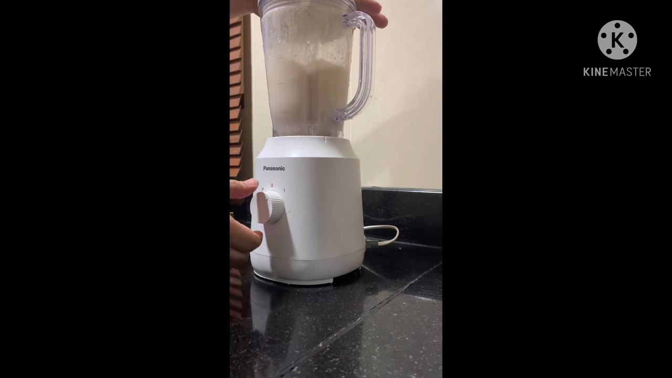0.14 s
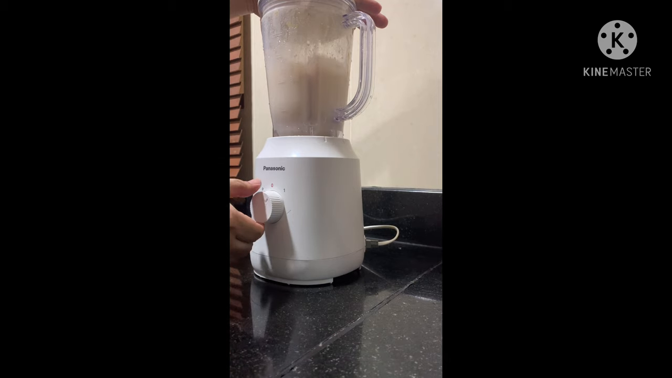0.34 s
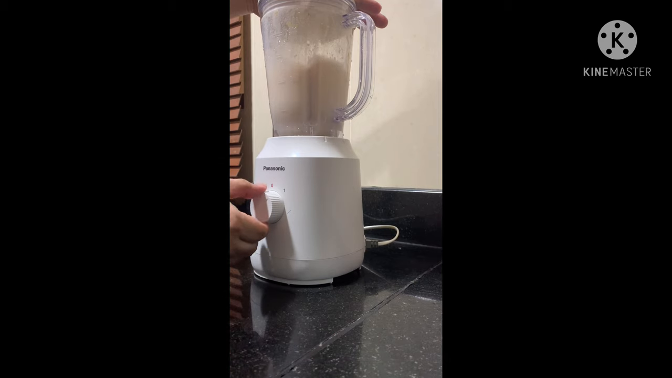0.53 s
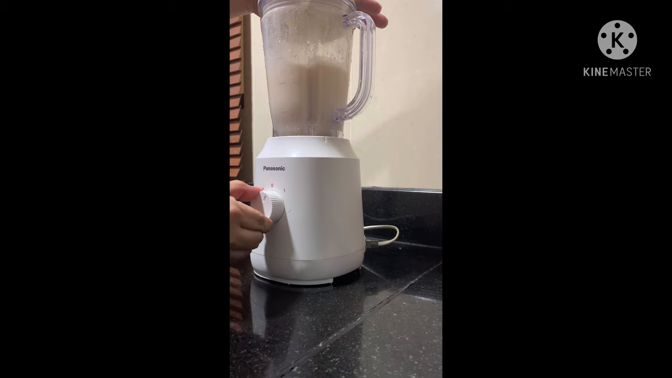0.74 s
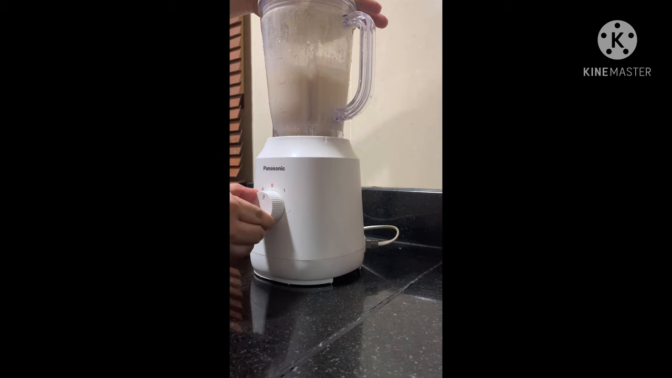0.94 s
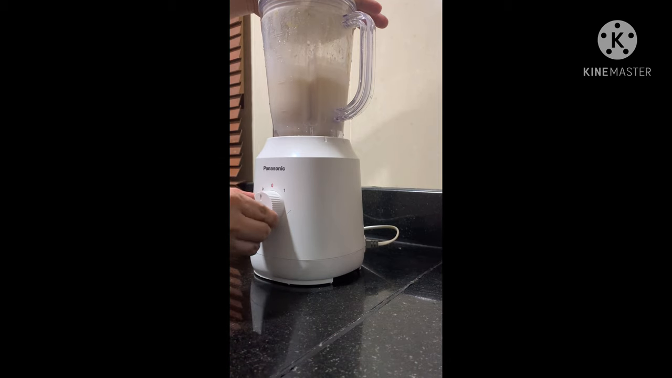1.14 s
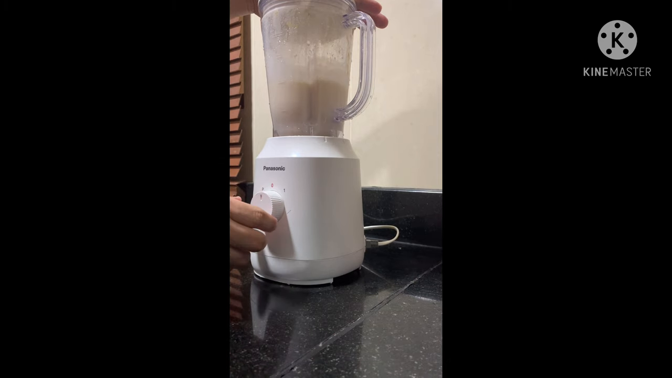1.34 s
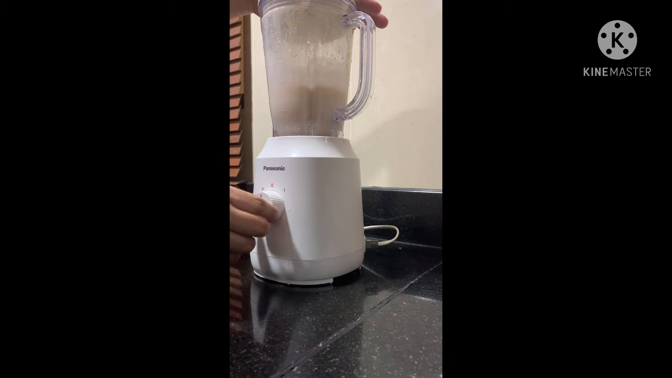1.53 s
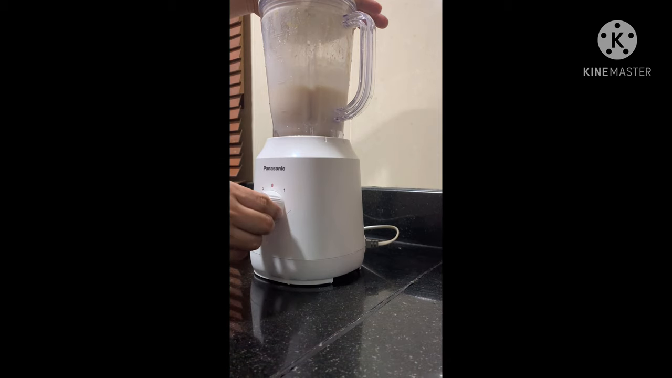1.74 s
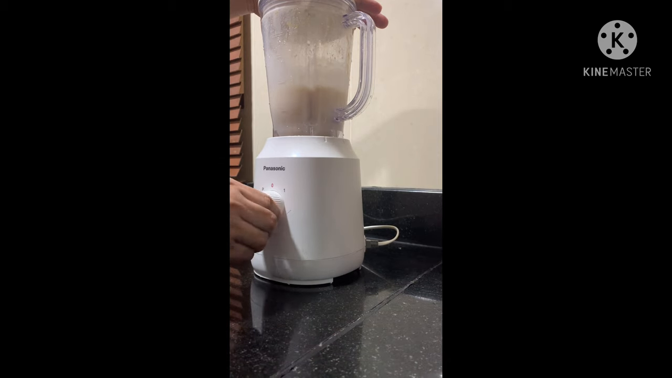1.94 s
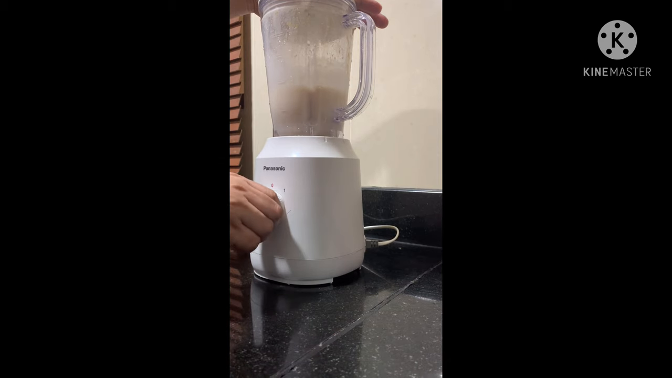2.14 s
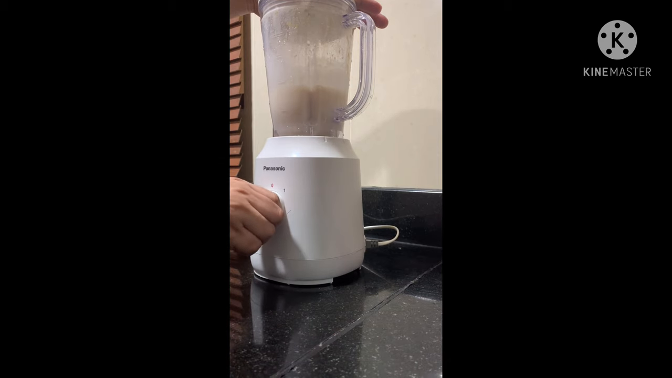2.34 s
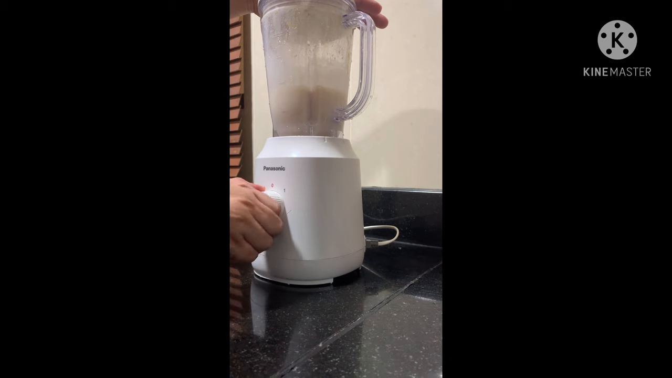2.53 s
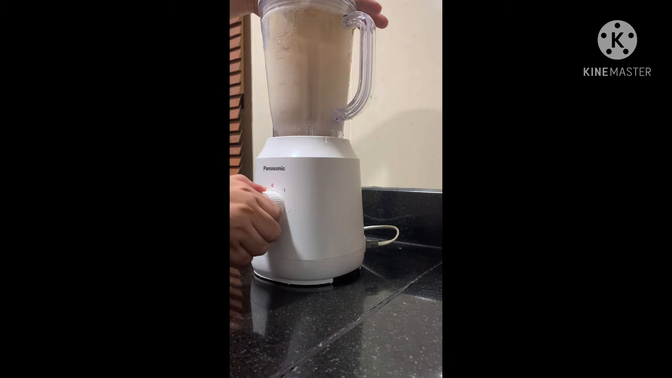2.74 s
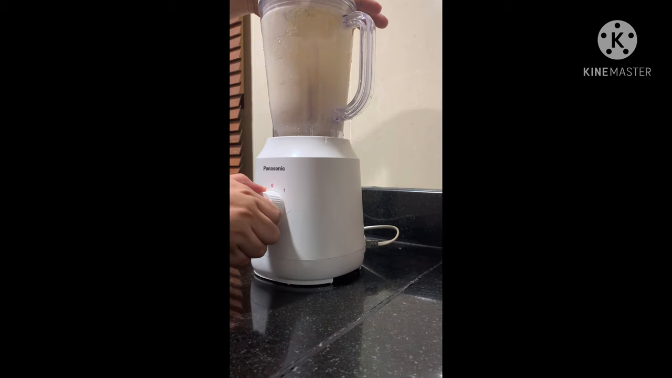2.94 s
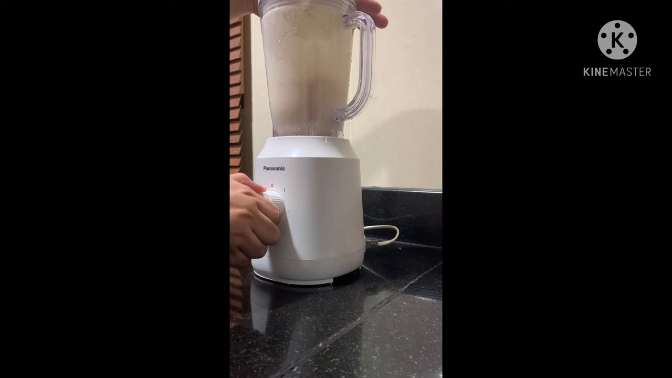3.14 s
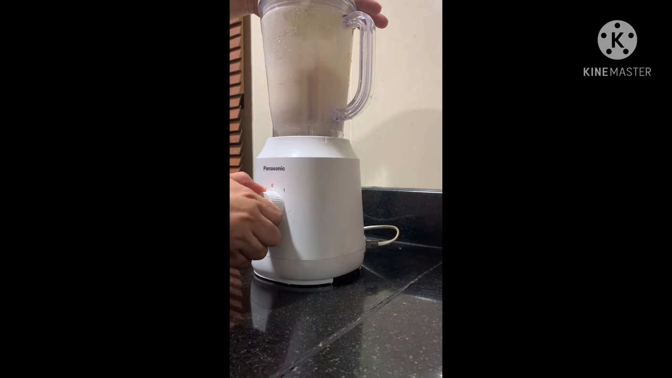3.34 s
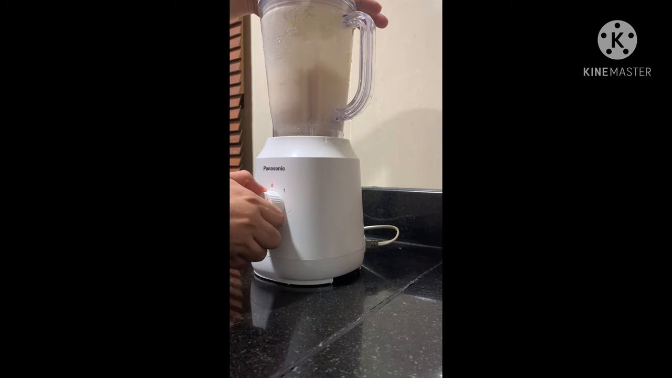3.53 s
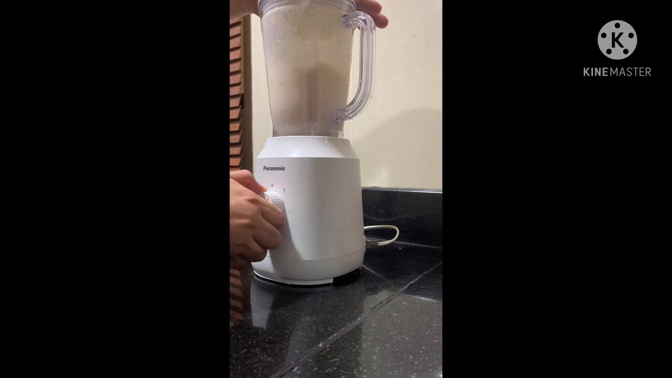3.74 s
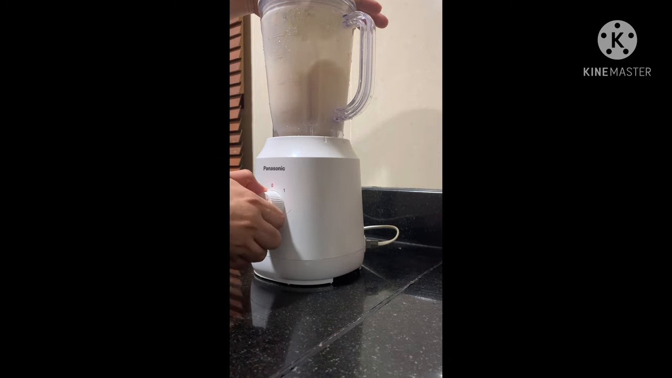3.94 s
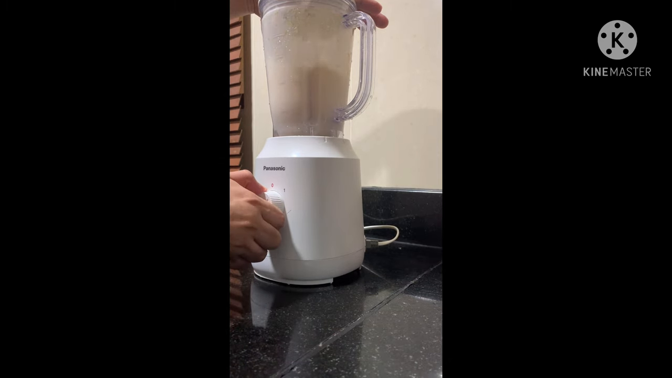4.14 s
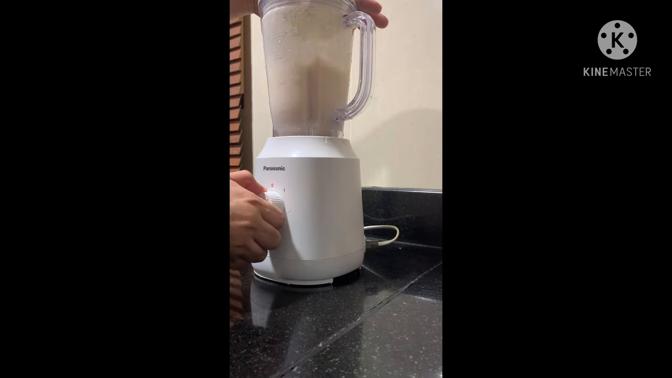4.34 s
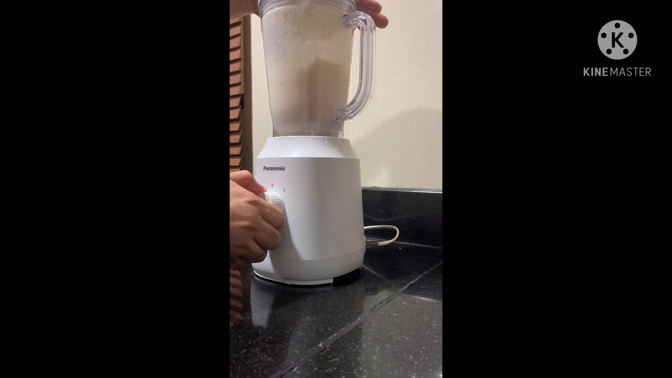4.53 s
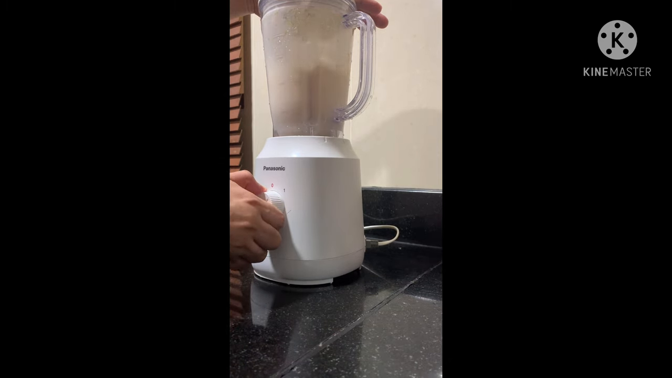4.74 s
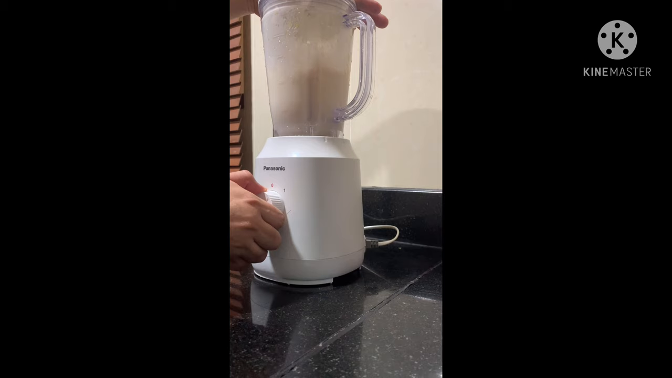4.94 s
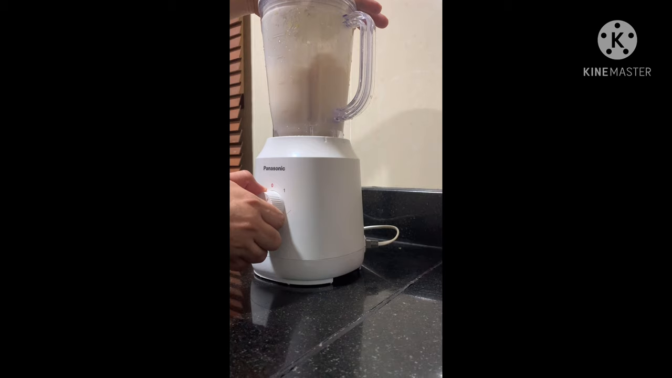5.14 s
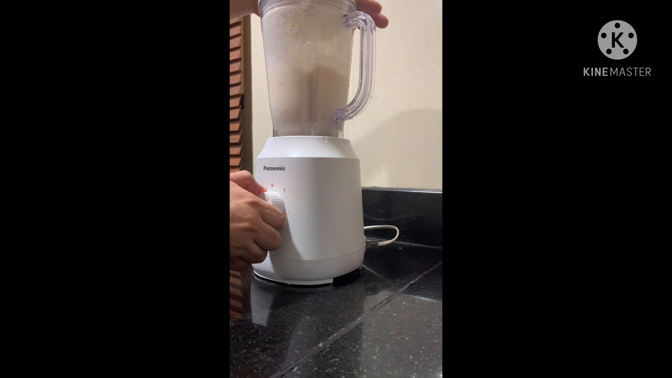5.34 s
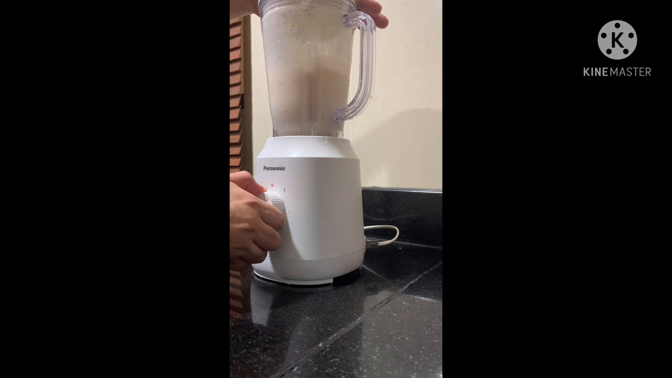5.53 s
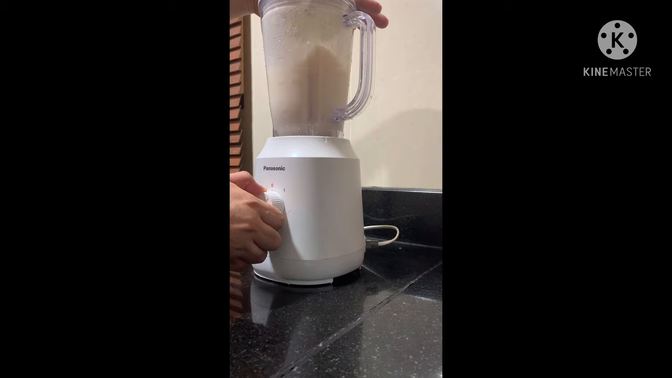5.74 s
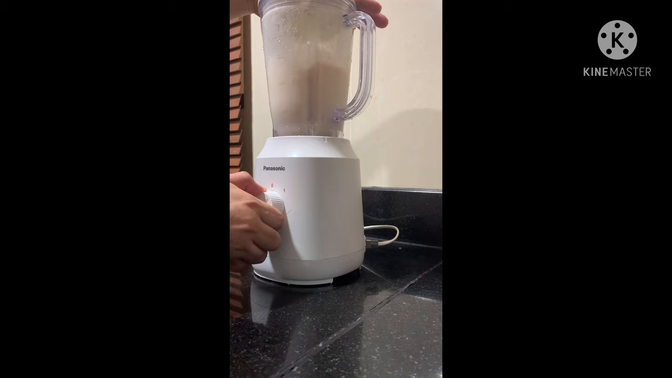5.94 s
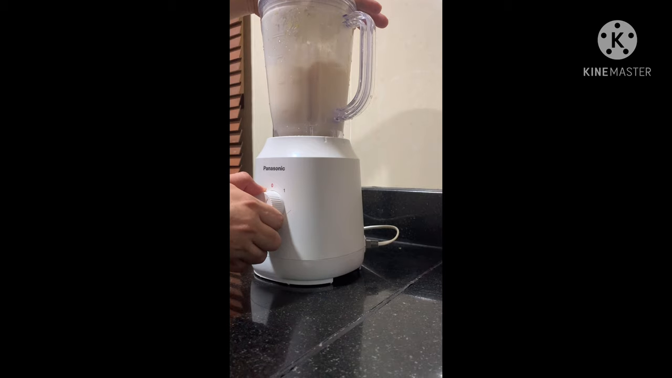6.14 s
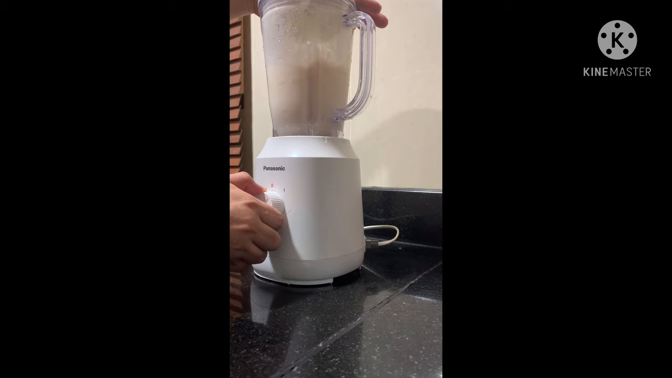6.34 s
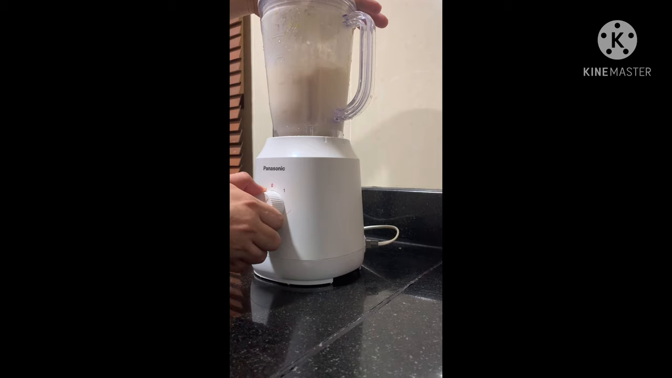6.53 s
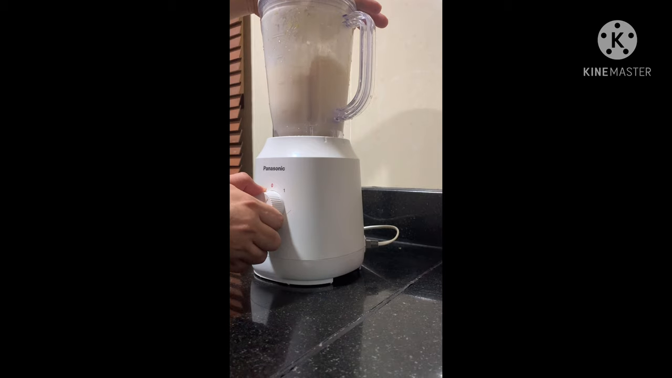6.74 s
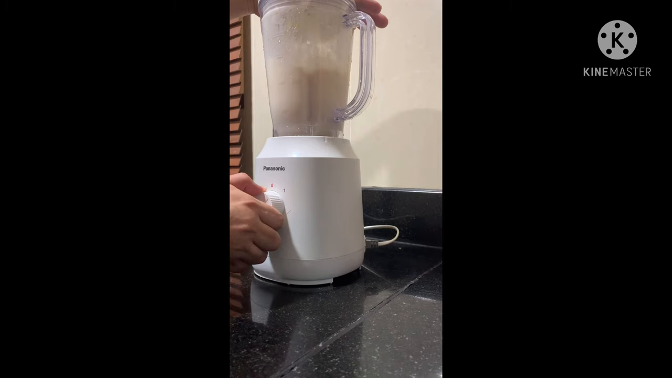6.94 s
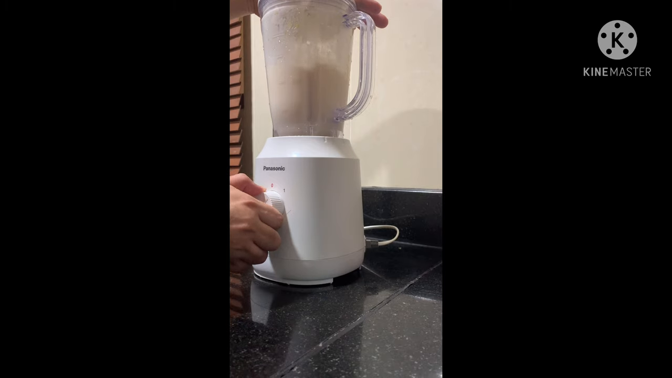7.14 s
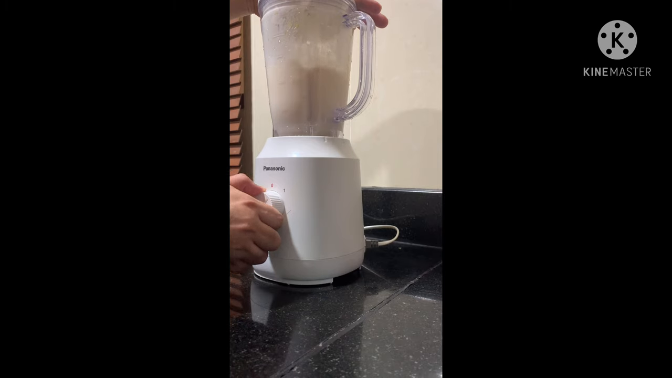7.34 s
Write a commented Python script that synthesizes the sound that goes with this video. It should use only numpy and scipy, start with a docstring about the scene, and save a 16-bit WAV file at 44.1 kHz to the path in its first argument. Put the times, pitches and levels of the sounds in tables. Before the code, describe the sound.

A countertop blender is churning slush when its knob clicks twice and the motor winds down with a falling whirr. After a short pause with faint rustling, a sharp click starts it again. It jolts, its feet chatter briefly on the stone counter, and it rises to a louder, steady roar with a low hum and bright hiss. It is heard nearby in stereo, with a short kitchen echo.

```python
"""In a kitchen, a blender on a stone counter coasts to a stop after two clicks of its knob,
rests with faint rustles, and is switched on again with a jolt and a short chatter of its feet.
The unbalanced shaft hums, the mains current throbs in the motor, and fan air and churned slush
roar through the housing and jar. Two microphone ports (left and right) hear it all directly,
the left a little late, and by way of the kitchen walls."""
import sys
import numpy as np
from scipy import signal
from scipy.fft import rfft, irfft, next_fast_len
from scipy.io import wavfile
from scipy.ndimage import uniform_filter1d

SR = 44100
rng = np.random.default_rng(int(sys.argv[2]) if len(sys.argv) > 2 else 0)


def generate_wav(signal):
    """Clip the signal to [-1, 1] and save it as 16-bit WAV at the path in sys.argv[1]."""
    frames = np.transpose(np.atleast_2d(signal))
    scaled = np.clip(frames, -1, 1) * 32767
    pcm = np.round(scaled).astype(np.int16)
    wavfile.write(sys.argv[1], SR, pcm)


N = 325017
T = np.arange(N) / SR
SIZE = next_fast_len(N + SR)
HZ = np.arange(SIZE // 2 + 1) * SR / SIZE
PATHS = 3  # rows of a sound: direct, scattered to the left, scattered to the right
FULL_HZ, MAINS_HZ = 212, 100  # shaft at full speed; magnetic pull, twice per mains cycle

# The two spells with the current on: on/s, off/s, mains hum/dB, roar/dB, shaft hum/dB,
# twice-a-turn hum/dB (base levels)
POWER = [(-.1, .745, -56, -30.5, -45, -49.5), (2.56, 8, -50, -26.5, -39.5, -44)]
CUT_S, RESTART_S = POWER[0][1], POWER[1][0]
# Pitches at which the housing rings: f/Hz, width/Hz, boost/dB
HOUSING = [(309, 50, 4), (600, 36, 2.5), (951, 30, 8.5), (1254, 35, 5.5), (1747, 48, 4), (1845, 36, 4.5),
           (2002, 150, 5), (2152, 120, 4.5), (2365, 82, 9), (2678, 173, 9), (2932, 51, 6), (4900, 200, 3.5),
           (10100, 70, 4.5)]
RESTARTED = T >= RESTART_S
SINCE_RESTART = np.clip(T - RESTART_S, 0, None)


def undb(db):
    """Turn decibels into a gain."""
    return 10 ** (np.asarray(db) / 20)


def over_hz(table):
    """Read a table of (f/Hz, value) at every frequency."""
    hz, value = np.transpose(table)
    return np.interp(np.log(HZ + 1), np.log(hz), value)


def colour(x, spectrum, rings=()):
    """Shape a sound by a spectrum and any ringing pitches, then set its rms level to 1."""
    boost = undb(sum(db / (1 + (2 * (HZ - f) / width) ** 2) for f, width, db in rings))
    y = irfft(rfft(x, SIZE) * boost * undb(over_hz(spectrum)), SIZE)[..., :N]
    return y / np.sqrt(np.mean(y ** 2))


def walk(rate):
    """A smooth random wander that picks a new value `rate` times a second."""
    hold = int(SR / rate)
    steps = np.repeat(rng.standard_normal(N // hold + 1), hold)
    return uniform_filter1d(uniform_filter1d(steps, hold), hold)[:N]


def fade(t, t60):
    """A fade that drops 60 dB in t60 seconds."""
    return np.exp(-np.log(1000) * t / t60)


def swell(peak_s, db, rise_s, fall_s):
    """A level that rises to a peak and falls away."""
    return undb(db) * np.exp(np.minimum((T - peak_s) / rise_s, (peak_s - T) / fall_s))


def kitchen():
    """The room's low hush, with a faint hum from elsewhere."""
    # Spectrum of the hush: f/Hz, level/dB
    spectrum = [(30, -8), (60, -7.5), (110, -6.5), (173, -23), (260, -17), (450, -23), (600, -28.5),
                (800, -33), (1800, -42), (3000, -49.5), (4500, -53), (12000, -58), (16000, -85)]
    # Tones of the far hum: f/Hz, level/dB
    far_hum = [(247.6, -77), (489.9, -81)]
    hush = undb(-59 + 1.8 * walk(5.2)) * colour(rng.standard_normal((PATHS, N)), spectrum)
    return hush + sum(undb(db + 3 * walk(8.9)) * np.sin(2 * np.pi * f * T) for f, db in far_hum)


def shaft():
    """Drag slows the shaft, current spins it up: its speed, halvings below full speed, and angle."""
    # Speeding up after the restart: t/s, speed/Hz
    spin_up = [(2.575, 73.5), (2.651, 111.8), (2.711, 141.5), (2.805, 179.1), (2.893, 204.6), (3.1, 207),
               (3.4, 212.2), (7.4, 212.5)]
    first_hz, friction_hz, coast_s = 209.2, 30.13, .5
    coasted = np.clip(T - CUT_S, 0, None)
    coast = (first_hz + friction_hz) * np.exp(-coasted / coast_s) - friction_hz
    hz = np.where(RESTARTED, np.interp(T, *np.transpose(spin_up)), np.clip(coast, 1, None))
    halvings = np.log2(FULL_HZ / hz)
    wobble = 1 + 0.01174 * walk(18) + .015 * snag(halvings) * walk(41.8)
    return hz, halvings, 2 * np.pi * np.cumsum(hz * wobble) / SR


def snag(halvings):
    """A coasting shaft catches on the slush more as it slows."""
    return ~RESTARTED * np.clip(halvings, 0, 2)


def levels(halvings):
    """Levels in dB of the roar, shaft hum and twice-a-turn hum as the motor coasts and restarts."""
    roar_db, hum_db, twice_db = np.array(POWER)[RESTARTED.astype(int), 3:].T
    lumpy = np.exp(-SINCE_RESTART) * RESTARTED  # a lumpy load is louder until it settles
    roar_dip = 14 * np.exp(-SINCE_RESTART / 0.24)  # the slush takes a moment to get moving
    twice_dip = 7 * np.exp(-(SINCE_RESTART / 0.29) ** 2)
    roar_db = roar_db + 3 * lumpy - np.where(RESTARTED, roar_dip, 11 * halvings)
    twice_db = twice_db - np.where(RESTARTED, twice_dip, 2 * halvings)
    return roar_db, hum_db + 5 * lumpy, twice_db


def shaft_hum(hz, halvings, angle, bouts):
    """The unbalanced shaft hums at 1, 2 and 5 times its speed; chatter adds to the lower two."""
    # The base bouncing on its feet: shaft speed/Hz, hum boost/dB
    bounce = [(40, -21), (65, -19), (80, -12), (100, 2.5), (130, 11.5), (170, 1.5), (195, 0), (212, -1)]
    roar_db, hum_db, twice_db = levels(halvings)
    hum_db = hum_db + np.interp(hz, *np.transpose(bounce))
    once = undb(hum_db + 2.1 * walk(12) + 1.5 * snag(halvings) * walk(35)) + undb(-14) * bouts
    twice = undb(twice_db + 1.1 * walk(7.7)) * (0.96 + 0.7 * walk(45))
    twice = twice * np.clip(hz / 73.8, 0, 1) ** 3 + undb(-6.5) * bouts  # dies away at low speed
    whine = undb(roar_db - 22 + 3.5 * walk(12))
    return once * np.sin(angle) + twice * np.sin(2 * angle) + whine * np.sin(5 * angle)


def mains_hum(angle):
    """The magnetic pull beats against the turning shaft: a hum, and a throb for the noisy layers."""
    pull = 2 * np.pi * MAINS_HZ * T
    live = sum(undb(db) * np.clip((T - on) / 0.017, 0, 1) * np.clip((off - T) / .03, 0, 1)
               for on, off, db, *_ in POWER)
    lower = undb(2.1 * walk(25)) * np.sin(angle - pull)
    upper = undb(5) * (0.4 + 1.2 * walk(50)) * np.sin(angle + pull)
    throb = 1 + .03 * (live > 0) * np.cos(pull) + .03 * np.cos(angle)
    return live * (np.sin(pull) + lower + upper), throb


def jar_thrum(lumps, halvings):
    """Lumps of slush make the jar thrum low, which stands out more as the blades slow."""
    # Spectrum of the thrum: f/Hz, level/dB
    spectrum = [(30, -36), (60, -18.5), (105, -10), (160, -15.5), (200, -13), (260, -4), (330, 1),
                (380, -10), (500, -5), (560, -12), (670, -2.5), (850, -17), (1100, -40)]
    return undb(-7 + 4 * halvings + 1.16 * walk(40)) * colour(lumps, spectrum, HOUSING)


def fast_roar(lumps):
    """Fast blades churn the slush into a roar; each band of it flutters on its own."""
    # Spectrum of the roar: f/Hz, level/dB
    spectrum = [(600, -37), (850, -19), (950, -12), (1200, -5.5), (1500, -11.5), (1790, -4.5), (2050, -2),
                (2400, -8.5), (2900, -6), (3200, -10.5), (4000, -7), (4700, -7), (5600, -13.5),
                (7000, -37.5)]
    # Centres of the fluttering bands: f/Hz
    bands = [600, 900, 1300, 1700, 1850, 2020, 2200, 2370, 2650, 2950, 3800, 4750, 7500]
    level = undb(2.5 + .5 * walk(9) + 0.87 * walk(60))
    whole, roar = rfft(colour(lumps, spectrum, HOUSING), SIZE), 0
    for share in np.eye(len(bands)):
        band = irfft(whole * np.interp(HZ, bands, share), SIZE)[:, :N]
        roar = roar + undb(1.6 * walk(45)) * band
    return level * roar


def fan_air(lumps, hz, halvings):
    """The fan blows hissing air through the housing and falls silent as it stalls."""
    # Fan air, a bright hiss from about 6 to 15 kHz: f/Hz, level/dB
    # The table also cuts a narrow gap at 11.6 kHz, which is not part of the fan's own sound.
    hiss_with_gap = [(4800, -17.5), (5600, -2.5), (6500, 2.5), (7000, 5), (7500, 0.5), (8200, 6), (9000, 1),
                     (10200, 1), (10900, 3), (11600, -34.5), (12400, 3), (13500, -7.5), (15000, -2.5),
                     (15600, -11.5)]
    stall_hz = 40
    level = np.clip(hz / stall_hz, 0, 1) ** 2 * undb(0.5 - halvings + 0.81 * walk(12))
    return level * colour(lumps, hiss_with_gap, HOUSING)


def knob():
    """The catch rubs up a slope and drops into a notch: a tick, and a scrape that rings the shell."""
    # Clicks: t/s, level/dB, extra for the tick/dB, extra for the low thud/dB, scrape fade/s,
    # extra for the rub/dB, dulling/dB per octave
    clicks = [(0.7248, -26.5, 15, 9, 0.0018, -40, 0), (0.7286, -19.5, -4, 6.5, 0.0046, -40, -1),
              (1.0149, -13.5, -5, -2, 0.0039, -35, 4), (1.0245, -19.5, -5, -1, 0.0047, -35, -2),
              (1.969, -63, -40, -6, .014, -10, 30), (2.5578, -11, -9, -3, 0.0048, -10.5, 2)]
    # Ringing of the plastic shell: f/Hz, level/dB, time to fade 60 dB/s
    rings = [(700, -11, 0.023), (1040, -8, 0.014), (1230, -9, 0.014), (1770, -6.5, 0.014),
             (2020, -1.5, 0.01), (2540, -1, 0.012), (3180, -2, 0.012), (3520, -6, .008),
             (4470, -11, 0.0071)]
    dull_above_hz, strike = 2300, 4.3
    out, t = np.zeros(N + SR), T[:SR // 10]
    tick_band = signal.butter(2, [4300, 13500], "band", fs=SR, output="sos")
    rub_band = signal.butter(1, [1200, 4500], "band", fs=SR, output="sos")
    tick_fade = np.exp(-t / 0.0041) + 0.2 * np.exp(-t / 0.018)
    for s, db, tick_db, thud_db, scrape_s, rub_db, dull_db in clicks:
        scrape = rng.standard_normal(len(t)) * np.exp(-t / scrape_s) + strike * (t == 0)
        shell = 0
        for k, (f, ring_db, t60) in enumerate(rings):
            gain = undb(ring_db + thud_db * (f < 900) - dull_db * max(np.log2(f / dull_above_hz), 0))
            shell = shell + (-1) ** k * gain * np.sin(2 * np.pi * f * t) * fade(t, t60)
        shell = signal.fftconvolve(shell, scrape)[:len(t)]
        tick = signal.sosfilt(tick_band, rng.standard_normal(len(t)) * tick_fade)
        rub = signal.sosfilt(rub_band, rng.standard_normal(len(t))) * np.exp(-t[::-1] / 0.0038)
        shell, tick, rub = (x / np.abs(x).max() for x in (shell, tick, rub))
        at = int(s * SR)
        out[at - len(t):at] += undb(db + rub_db) * rub
        out[at:at + len(t)] += undb(db) * (shell + undb(tick_db) * tick)
    return signal.sosfilt(signal.butter(2, 600, "high", fs=SR, output="sos"), out[:N])


def slow_slosh(lumps, halvings):
    """Slow blades strike softly: a duller whirr in the jar that sinks in pitch with the speed."""
    # Spectrum of the whirr before it sinks: f/Hz, level/dB
    spectrum = [(550, -21.5), (770, -2.5), (950, -9.5), (1280, -4.5), (1600, -4.5), (1900, -5),
                (2350, -3.5), (3600, -4.5), (5400, -8), (6700, -21.5), (8300, -38.5)]
    # Ringing of the jar before it sinks: f/Hz, width/Hz, boost/dB
    jar = [(780, 45, 8), (1150, 80, 5), (1900, 110, 9.5)]
    whirr = undb(5 + 2 * walk(30)) * colour(lumps, spectrum, jar)
    slowed_time = np.cumsum(1 - .09 * np.clip(halvings, 0, 3)) / SR
    return np.array([np.interp(slowed_time, T, path) for path in whirr])


def rustle():
    """Slush settles and fingers brush the knob: faint swells of grainy hiss."""
    # Swells: t/s, level/dB, rise/s, fall/s
    swells = [(1.55, -71, .03, 0.19), (1.76, -83, 0.023, 0.082), (2.06, -88, .01, 0.037),
              (2.23, -87, .02, .04)]
    # Spectrum of the rustle: f/Hz, level/dB
    spectrum = [(1200, -23), (1800, -6), (2200, 0), (2600, -5), (3200, -1), (3600, -22), (6000, -20)]
    level = sum(swell(*row) for row in swells) * undb(4 * walk(60.3))
    return level * colour(rng.standard_normal((PATHS, N)), spectrum)


def jolt(ring_hz=308):
    """The housing jolts and rings as the current comes back on."""
    return undb(-22) * np.sin(2 * np.pi * ring_hz * SINCE_RESTART) * fade(SINCE_RESTART, t60=0.163)


def chatter_bouts():
    """How hard the base chatters as the quickening shaft passes the speed at which it bounces."""
    # Bouts of chatter: t/s, level/dB
    bouts = [(2.635, -35.5), (2.657, -23.5), (2.678, -26.5), (2.697, -20.5), (2.732, -27)]
    return sum(swell(s, db, rise_s=0.0144, fall_s=0.0116) for s, db in bouts)


def feet_chatter(angle, bouts):
    """During each bout the feet slap the stone once a turn."""
    # Spectrum of feet on stone: f/Hz, level/dB
    spectrum = [(120, -25), (220, -7), (300, 1.5), (380, -12), (500, -11), (700, -12), (850, -19.5),
                (1100, -13), (1500, -20.5), (3000, -29.5)]
    slaps = np.exp(np.cos(angle) - 1) * rng.standard_normal(N)
    return bouts * colour(slaps, spectrum)


def blender():
    """The whole machine: its shaking (one row) and its rushing noise (one row per path)."""
    hz, halvings, angle = shaft()
    bouts = chatter_bouts()
    hum = shaft_hum(hz, halvings, angle, bouts)
    mains, throb = mains_hum(angle)
    # lumps of slush hit the blades with uneven force
    low, mid, high = rng.standard_normal((3, PATHS, N)) * undb(0.56 * walk(600)) * throb
    thrum = jar_thrum(low, halvings)
    slow = np.clip(1.5 * (1 - hz / FULL_HZ), 0, 1)
    churn = (1 - slow) * fast_roar(mid) + slow * slow_slosh(mid, halvings)
    air = fan_air(high, hz, halvings)
    start_s, stall_hz = 0.0071, 34
    running = np.clip(np.where(RESTARTED, SINCE_RESTART / start_s, hz / stall_hz), 0, 1)
    shaking = running * np.sqrt(2) * (hum + mains) + feet_chatter(angle, bouts) + jolt()
    roar_db, *_ = levels(halvings)
    return shaking, running * undb(roar_db) * (thrum + churn + air)


def walls(x, t60=0.18):
    """Three rows: the sound itself, then its echo off the walls at the left and right port."""
    t = T[:SR // 2]
    echo = rng.standard_normal((2, len(t))) * fade(t, t60)
    echo = echo / np.sqrt(np.sum(echo ** 2, axis=1, keepdims=True))
    return np.vstack([x, irfft(rfft(x, SIZE) * rfft(echo, SIZE), SIZE)[:, :N]])


def blend(a, b, share):
    """Mix two sounds, weighting b's power by `share` and a's by the rest."""
    return np.sqrt(1 - share) * a + np.sqrt(share) * b


def ports(paths):
    """Turn the three paths into left and right; the direct sound reaches the left port late."""
    # Sound that arrives directly: f/Hz, share of power
    direct_share = [(60, .95), (300, 0.96), (450, 0.67), (600, 0.66), (800, 0.39), (1300, 0.22), (2000, .3),
                    (4000, .2), (6000, 0.21), (7500, 0.3), (9000, .85), (11500, 1), (14000, 1), (15500, .7)]
    # How much louder the left port is than the right: f/Hz, level/dB
    left_over_right = [(60, -2), (200, 1), (450, -7), (1000, -1), (2400, -1), (4800, -4.5), (6200, -2.5),
                       (8000, 0)]
    direct, *scattered = rfft(paths, SIZE)
    # the bass comes up from the counter and reaches both ports almost together
    treble_lag_s, bass_lag_cycles = 9.5 / SR, .025
    cycles = treble_lag_s * HZ / (1 + (2200 / (HZ + 1)) ** 4) + bass_lag_cycles / (1 + (HZ / 500) ** 4)
    lag = np.exp(-2j * np.pi * cycles * np.array([[1], [0]]))
    balance = undb(over_hz(left_over_right) * np.array([[.5], [-.5]]))
    heard = blend(np.array(scattered), lag * direct, np.clip(over_hz(direct_share), 0, 1))
    return irfft(balance * heard, SIZE)[:, :N]


def scene():
    """The blender and its knob, with wall echoes and rustles, over the kitchen's hush."""
    hush = kitchen()
    shaking, roar = blender()
    # a quarter of the scattered roar comes from the spot on the machine that is heard directly
    roar[1:] = blend(roar[1:], walls(roar[0])[1:], 0.25)
    hum = blend(shaking, walls(shaking), np.array([[0], [0.79], [0.79]]))
    clicks = knob()
    clicks = blend(clicks, walls(clicks, t60=0.1), 0.45)
    return ports(roar + hum + clicks + hush + rustle())


def record(dry):
    """The microphone loses the deepest bass and cuts the highest treble."""
    thin = signal.sosfilt(signal.butter(2, 45, "high", fs=SR, output="sos"), dry)
    return signal.sosfilt(signal.ellip(14, .2, 100, 15700, fs=SR, output="sos"), thin)


dry = scene()
out = record(dry)
generate_wav(out)
```